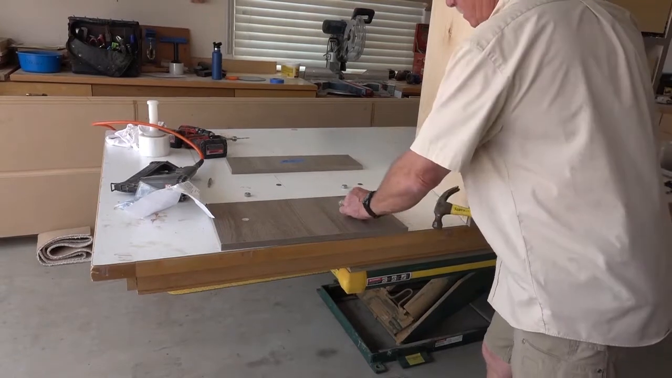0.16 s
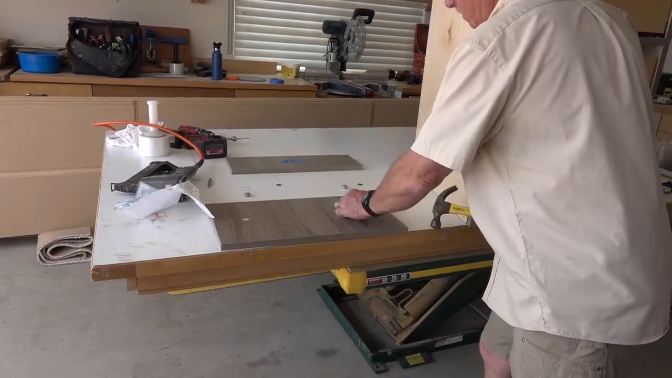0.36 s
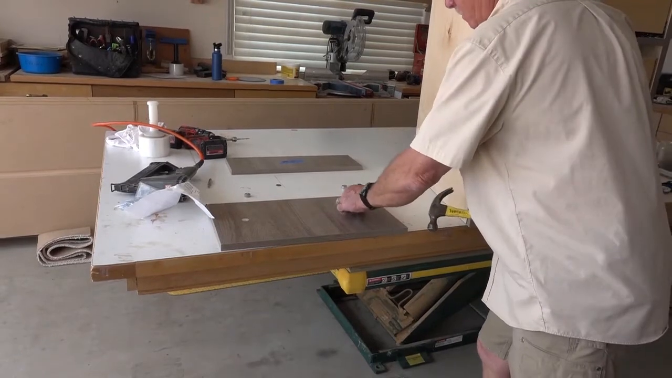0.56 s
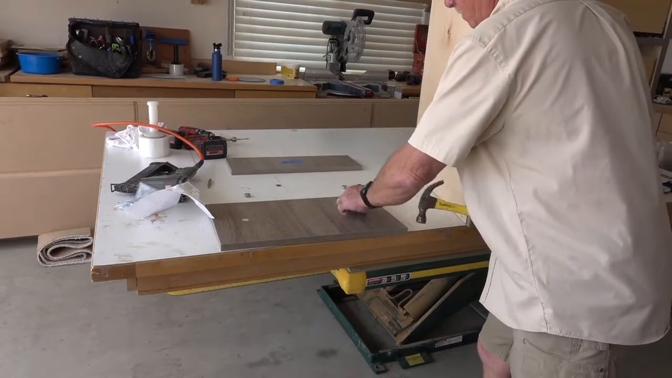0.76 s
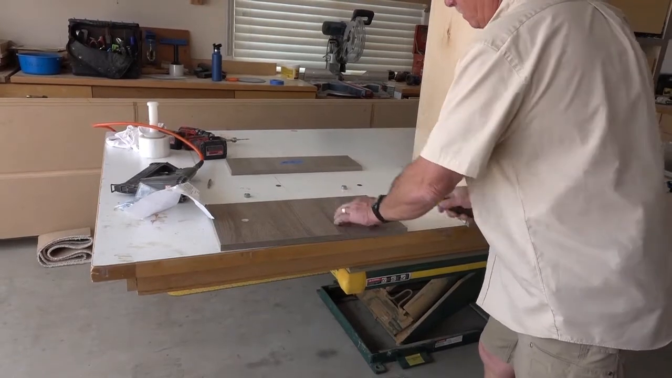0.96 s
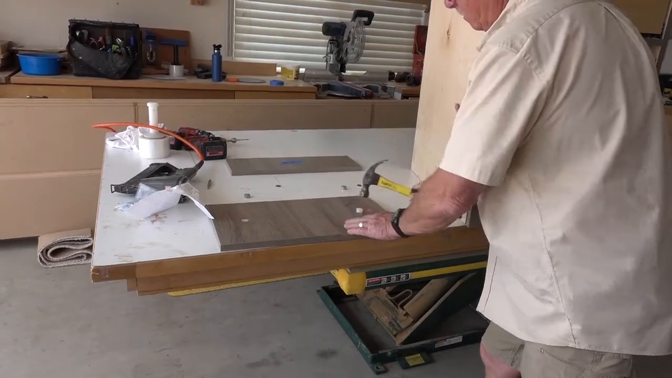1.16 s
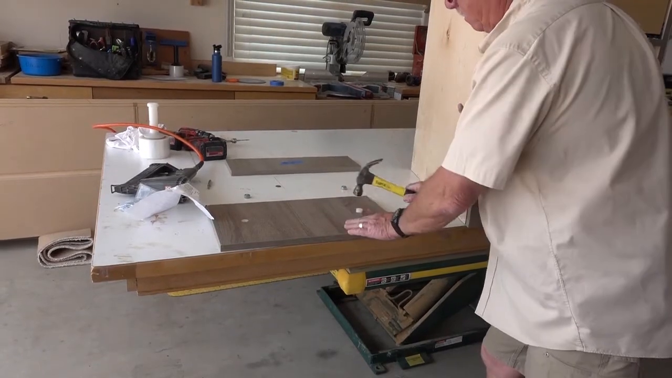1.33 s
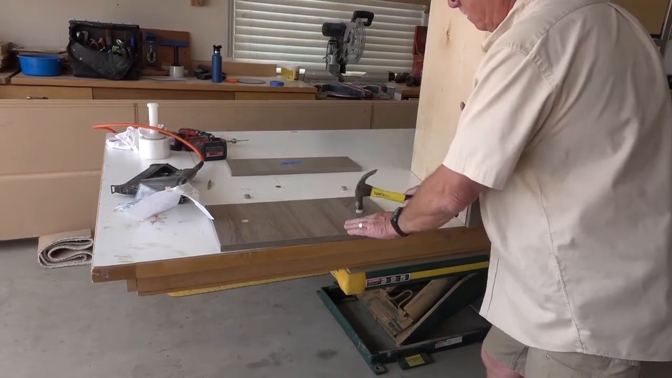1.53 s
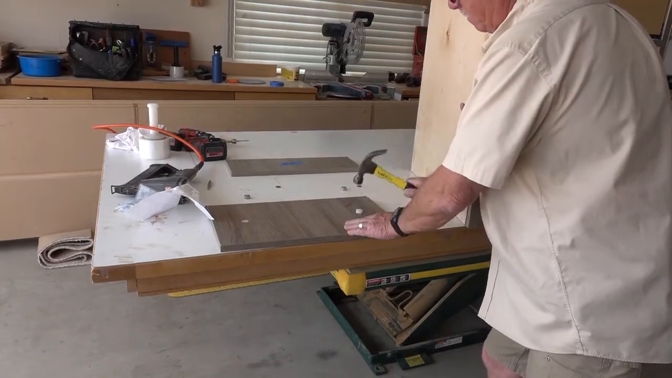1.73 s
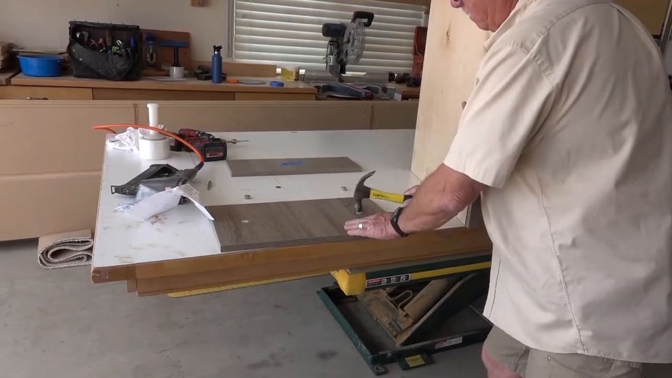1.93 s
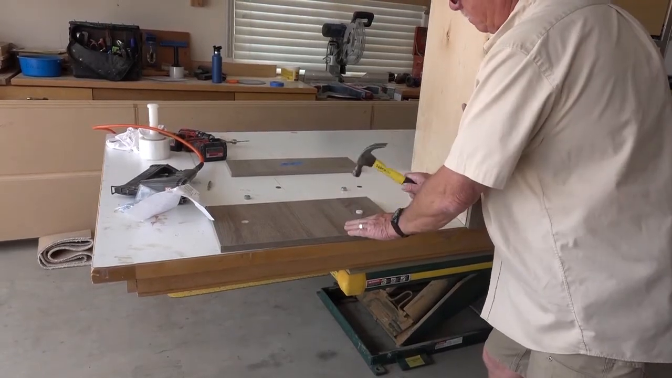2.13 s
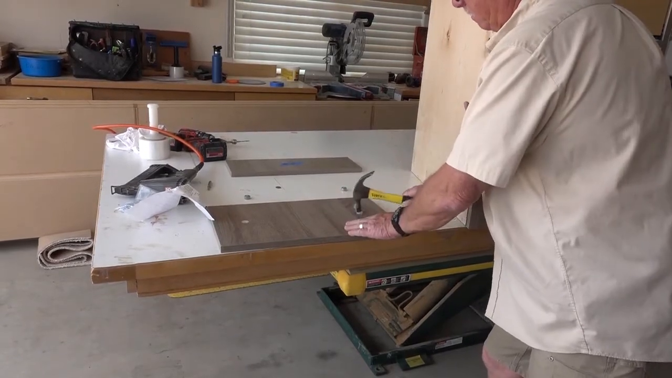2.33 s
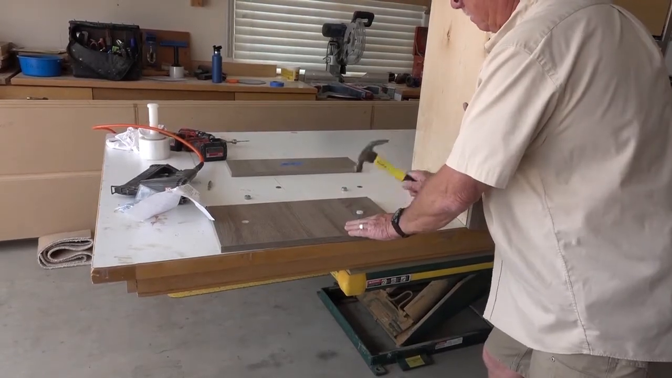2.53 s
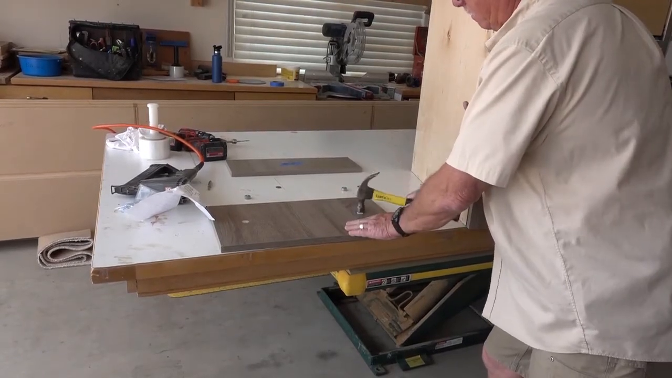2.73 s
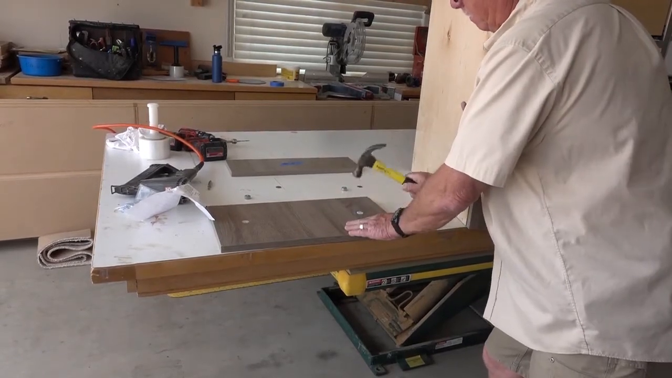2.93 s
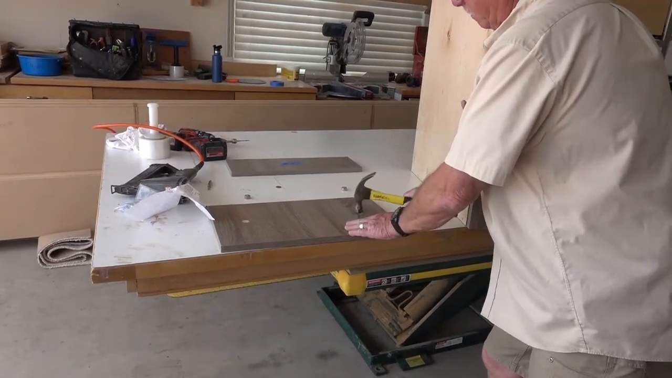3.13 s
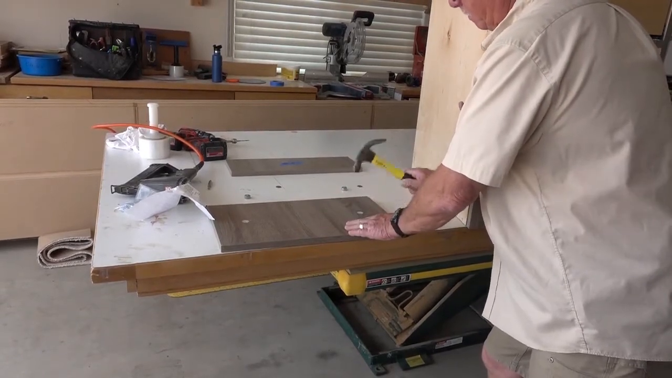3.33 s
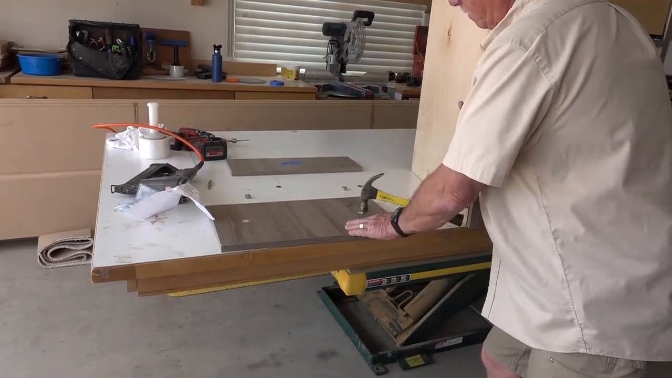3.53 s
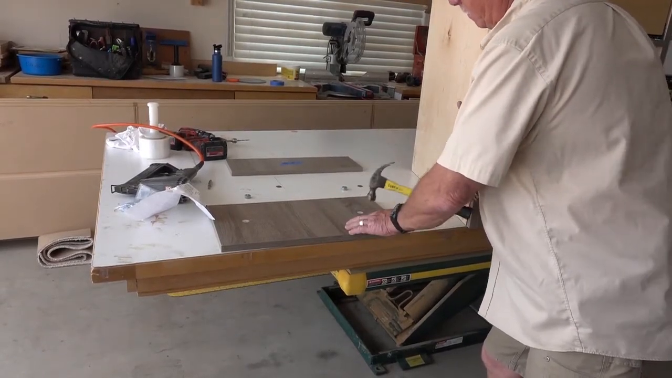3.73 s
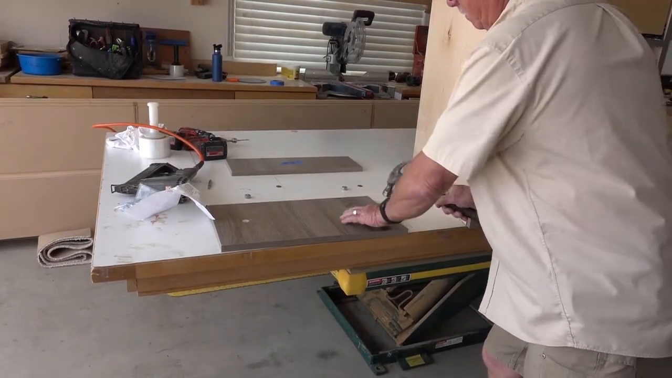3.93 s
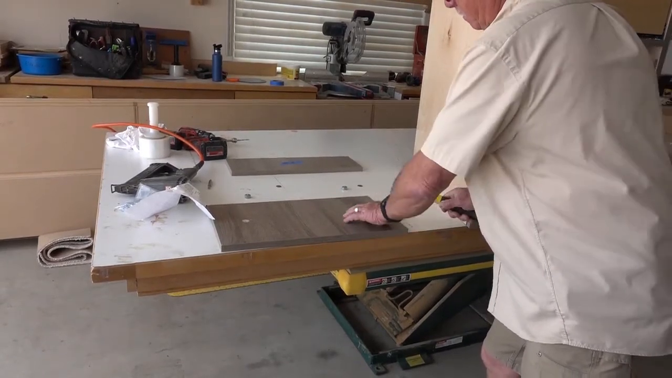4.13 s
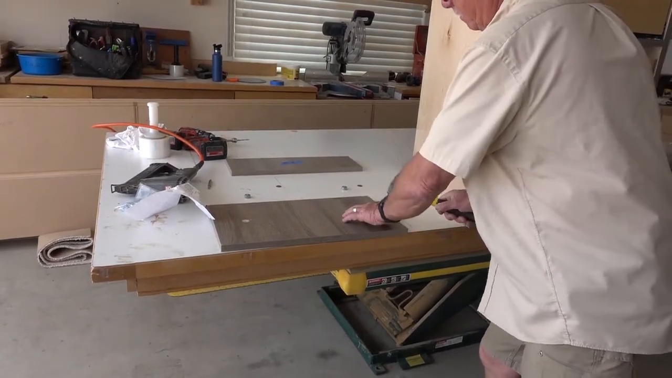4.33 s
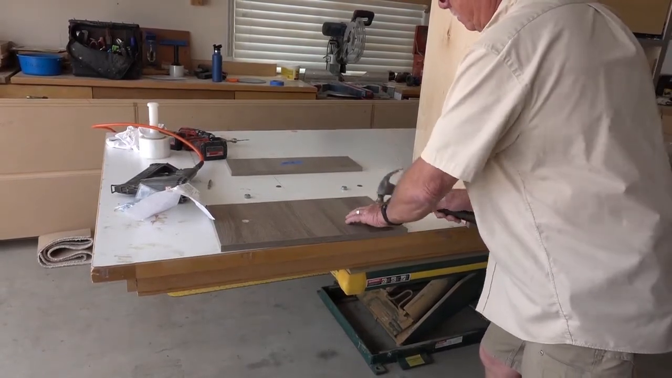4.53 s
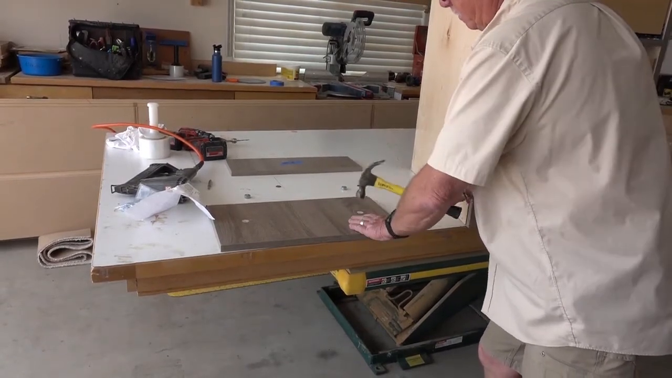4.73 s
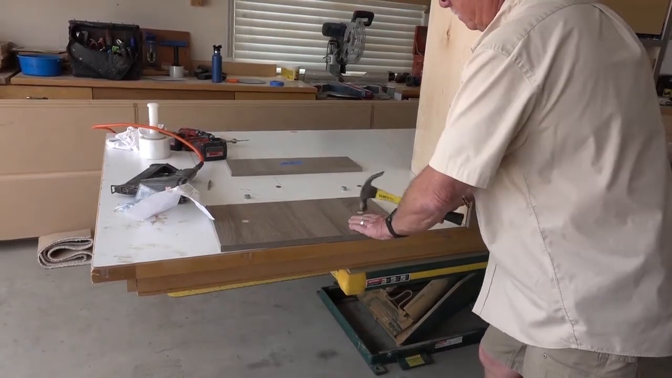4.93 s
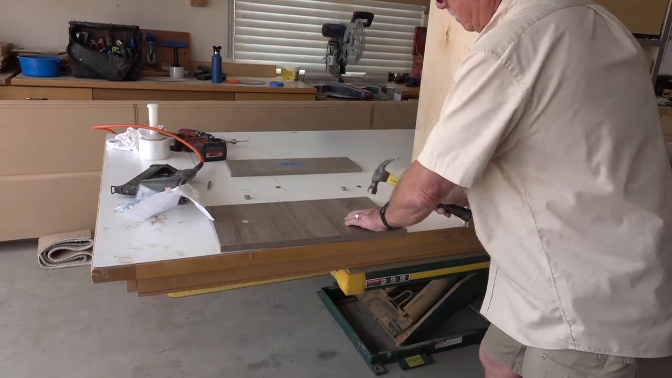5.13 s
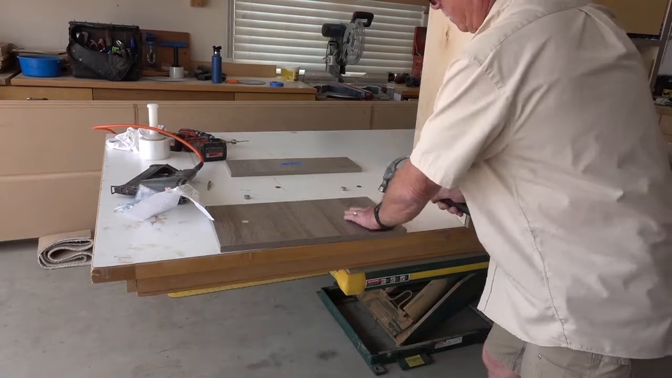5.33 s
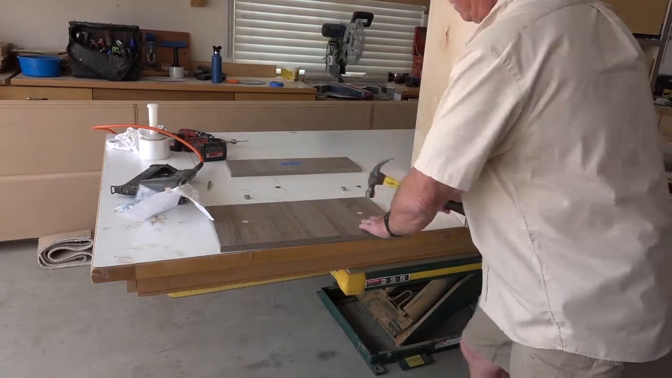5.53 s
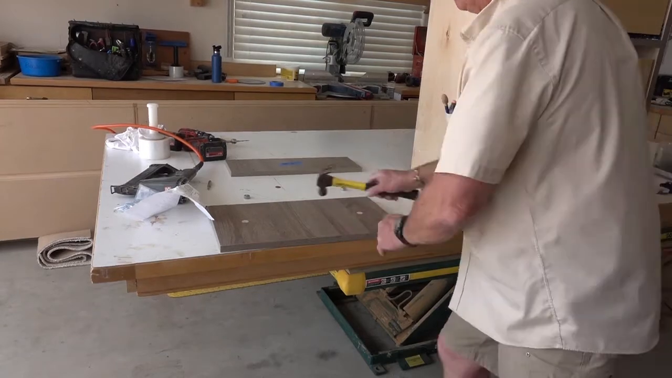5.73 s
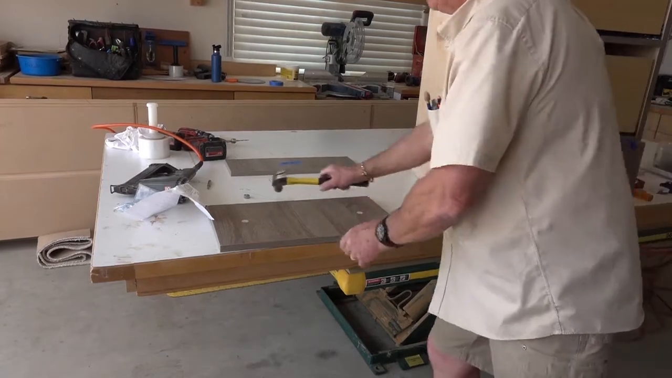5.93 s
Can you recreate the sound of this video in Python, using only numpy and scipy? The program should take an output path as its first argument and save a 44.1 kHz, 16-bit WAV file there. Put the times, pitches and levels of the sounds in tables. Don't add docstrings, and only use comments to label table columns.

```python
import sys
import numpy as np
from scipy import signal
from scipy.fft import irfft
from scipy.io import wavfile
from scipy.ndimage import uniform_filter1d

SR = 44100
rng = np.random.default_rng(int(sys.argv[2]) if len(sys.argv) > 2 else 0)


def waveform_to_disk(signal):
    frames = np.transpose(np.atleast_2d(signal))
    scaled = np.clip(frames, -1, 1) * 32767
    samples = np.round(scaled).astype(np.int16)
    wavfile.write(sys.argv[1], SR, samples)


def nominal_scale(level):
    x = np.asarray(level, float) / 20
    return 10 ** x


N = 267687

# start in seconds, strength in dB, hardness in dB per octave, bench boom in dB,
# swell in dB as the loose panel answers late.
BLOWS = [
    (1.4484, -1, 3, 22, 11.5),
    (1.8434, 4, 5.5, 27, 18),
    (2.28, 8, 2.5, 10.5, 22.5),
    (2.7013, 5.5, 3, 9, 15),
    (3.107, 6, 3, 11.5, 21.5),
    (3.5201, 10, 1, 5, 24),
    (4.9297, 7, 0, 3, 37.5),
    (5.7936, -45, 8, 7, 12.5),
]
# start in seconds, strength in dB, hardness in dB per octave, boom in dB.
CLICKS = [
    (0.334, -66, 4.5, -12),
    (0.393, -69, 5.5, -20),
    (5.004, -28.5, 5.5, 27),
    (5.598, -66.5, 3, -2),
    (5.671, -67, 4.5, -6),
    (5.826, -59.5, 2.5, -28),
]
# frequency in Hz, level in dB per Hz.
KNOCK_COLOUR = [(30, -37), (70, -19), (105, -12), (146, -6), (310, -2.5), (450, -10), (570, -3.5),
                (930, -9.5), (1300, -12), (2070, -20.5), (2600, -22), (5300, -38.5), (11000, -51),
                (14000, -68.5)]
# frequency in Hz, level in dB, T60 in seconds.
BENCH_MODES = [(135.54, -22, 0.24), (166.4, -25, 0.2), (206.4, -30, 0.4), (281.5, -32, 0.33),
               (373.6, -31, 0.35)]
# frequency in Hz, level in dB, T60 in seconds.
PANEL_MODES = [(544, -35, 0.37), (604, -16.5, 0.1), (702, -27.5, 0.28), (754, -29, 0.36),
               (897, -30.5, 0.24), (923.1, -35.5, 0.52), (1047, -11.5, 0.21), (1284, -28.5, 0.47),
               (1210, -36.5, 0.44), (1300, -52, 0.63), (1564, -28, 0.5), (1910, -47.5, 0.11),
               (2090, -27.5, 0.12), (2680, -26.5, 0.41)]
# frequency in Hz, level in dB, T60 in seconds.
FRAME_MODES = [(213.4, -52, 1.4), (222, -54, 0.7), (1140, -53, 0.9), (1175, -47, 1.1)]
# frequency in Hz, T60 in seconds.
SHOP_T60 = [(80, 0.24), (220, 0.26), (600, 0.3), (1800, 0.32), (4800, 0.34), (10000, 0.29)]
# frequency in Hz, likeness from 0 to 1.
SHOP_LIKENESS = [(60, 1), (170, 0.97), (500, 0.85), (1420, 0.79), (4090, 0.44), (11800, 0.89)]
# frequency in Hz, rise in seconds.
ROOM_FILL = [(100, .08), (300, .05), (700, .014), (3000, .012), (10000, .025)]
# start in seconds, level in dB.
LAID = [
    (5.794, -38.5),
    (5.82, -37),
]
# frequency in Hz, level in dB, T60 in seconds.
LAID_MODES = [(218, 1, 0.034), (1520, -19, .12), (2980, -16, .15), (4530, -14.5, 0.23)]
# time in seconds, frequency in Hz, level in dB.
SQUEAK = [(.14, 8050, -80), (.17, 8900, -76), (.195, 9450, -76), (.23, 9650, -74), (.28, 9500, -75),
          (.32, 9100, -77), (.355, 8950, -77), (.372, 9050, -77), (.387, 8600, -80)]
# start in seconds, level in dB, first Hz, last Hz, pan in dB to the left.
CHIPS = [(.565, -80, 5600, 5500, 13), (.55, -75, 3600, 3490, 17), (.622, -52, 5600, 5150, 8),
         (1.315, -77, 5400, 5060, 23), (2.183, -51.5, 5550, 5160, 8), (4.62, -80, 3470, 3370, 8.5),
         (5.3, -69, 5600, 5160, 15), (6.02, -68, 5670, 5150, 23)]
# middle in seconds, length in seconds, hand scuff in dB, cloth rustle in dB.
MOVES = [(0.027, .15, -74, -74), (0.405, 0.065, -61, -71), (1.113, 0.54, -87, -68.5), (3.957, .3, -85, -76),
         (5.29, 0.13, -55, -69.5), (4.174, 0.23, -94.5, -77), (4.376, 0.046, -90, -76.5),
         (4.73, 0.28, -75.5, -84.5), (5.5, 0.49, -77.5, -71), (5.65, 0.26, -60, -68),
         (5.879, 0.57, -64.5, -76.5)]
# frequency in Hz, level in dB per Hz.
RUMBLE_COLOUR = [(12, -41), (20, -5), (37, -7), (59, 12), (119, -6), (173, -0.5), (285, -13.5), (400, -12),
                 (520, -31), (880, -120)]
# frequency in Hz, level in dB per Hz.
ROAD_COLOUR = [(200, -43.5), (320, -20.5), (400, -8.5), (520, -7.5), (700, -4.5), (790, -3), (860, -2),
               (1120, -6.5), (1270, -6.5), (2300, -26.5), (3000, -43)]
# frequency in Hz, level in dB per Hz.
SCUFF_COLOUR = [(1200, -13.5), (1800, -0.5), (2500, -7), (3600, -9.5), (4600, -15), (6000, -21.5),
                (8000, -48)]
# frequency in Hz, level in dB per Hz.
CLOTH_COLOUR = [(2940, -26), (5000, -0.5), (5860, -4.5), (6590, -3.5), (7970, -3.5), (9750, -0.5),
                (11200, -4.5), (14600, -54.5), (22000, -120)]
# frequency in Hz, likeness from 0 to 1.
AIR_LIKENESS = [(60, 1), (170, 1), (500, 0.84), (1420, 0.56), (4090, 0.36), (11800, 0.55)]
# frequency in Hz, width in Hz, level in dB.
ROAD_LINES = [(105.6, 5.7, 8.5), (685, 12, 9), (735, 43, 9.5)]
# time in seconds, level in dB below
BACKGROUND_FADE = [(0, 0.5), (.85, -2.5), (1.45, -2), (4, -11.5), (4.35, -22.5), (4.9, -15.5), (5.4, -14.5),
                   (5.75, -21), (6.07, -13)]
# level in dB at loudest, share of the background fade it follows.
WASHES = [
    (-53.5, 0.58),
    (-49.5, 1.0),
    (-63, 1.1),
    (-75.5, 0.38),
]
# middle in seconds, length in seconds, level in dB.
LORRY = (5.4, 2, -55.5)

SPOT_DB, BEAT_DB, RING_DB = 5, 2.5, -10
FRAME_DB_PER_SWELL = 0.83
BOOM_HZ, HOLLOW_HZ = 333.8, 742
HOLLOW_SHARE = .3
CRACK_DB, CRACK_T60, CRACK_TILT_DB = -20.5, 0.0084, 5
CRACK_HZ, CRACK_FOCUS_DB = 1800, 2.2
TICK_DB, SEAT_S = -6, .0016
BOUNCE_S, BOUNCE_DB = .0045, 7
BUILD_S, SWELL_S = .006, .05
SNAP_PER_DB, FULL_BLOW_DB = .8, 6
CLICK_SWELL_DB, CLICK_SNAP_DB = -4, 12
LEFT_DB, TRAFFIC_LEFT_DB = 0.3, 3
ALIKE = 0.78
LUMPY_DB = 0.5
LATE_DB, LATE_T60 = -8.5, 0.99
CHIP_DIRECT_DB, CHIP_FLUTTER = -2, .008
LIMIT_DB, SQUEEZE, RELEASE_DB_PER_S = -18.5, 0.68, 156.5


def evened(x):
    return x / np.sqrt(np.mean(x ** 2) + 1e-20)


def read(points, hz):
    f, value = np.transpose(points)
    return np.interp(np.log(hz + 1), np.log(f + 1), value)


def add(mix, s, sound):
    part = mix[:, round(s * SR):][:, :sound.shape[1]]
    part += sound[:, :part.shape[1]]


def pair(likeness, hz, frames):
    a, b, c, d = rng.standard_normal((frames, len(hz), 4)).T
    share = np.clip(read(likeness, hz), 0, 1)[:, None]
    left = a + 1j * b
    right = share * left + np.sqrt(1 - share ** 2) * (c + 1j * d)
    return np.array([left, right])


def causal(db):
    log_gain = np.log(nominal_scale(np.maximum(db, -100)))
    full = np.concatenate([log_gain, log_gain[-2:0:-1]])
    return irfft(np.exp(np.conj(signal.hilbert(full))[:len(db)]))


def knock(row, common, modes, snap_db):
    s, db, hard_db, boom_db, swell_db = row
    hz = np.fft.rfftfreq(4096, 1 / SR)
    octaves = np.log2((hz + 30) / 1000)
    colour_db = read(KNOCK_COLOUR, hz) + hard_db * octaves
    hollow_db = HOLLOW_SHARE * boom_db * np.exp(-(np.log2((hz + 30) / HOLLOW_HZ) / .5) ** 2)
    body = causal(colour_db + hollow_db + boom_db / (1 + (hz / BOOM_HZ) ** 4))

    t = np.arange(common.shape[1]) / SR
    own = echoes(len(t), 0.99)
    wake_db = SPOT_DB * rng.standard_normal(len(modes))
    wake_db[-len(FRAME_MODES):] = FRAME_DB_PER_SWELL * (23.5 - max(swell_db, 15))
    struck = nominal_scale(wake_db) @ modes
    tail = common + np.sqrt(1 - ALIKE ** 2) * own + struck
    tail *= 1 - np.exp(-(t / BUILD_S) ** 2)
    tail *= nominal_scale(-swell_db * np.exp(-t / SWELL_S))
    sound = signal.fftconvolve(tail, body[None] / np.linalg.norm(body), axes=1)[:, :len(t)]

    chatter = rng.standard_normal(900) * nominal_scale(-60 * t[:900] / CRACK_T60)
    chatter = nominal_scale(TICK_DB) * chatter + np.roll(chatter, round(SEAT_S * SR))
    focus_db = CRACK_FOCUS_DB * np.log2((hz + 30) / CRACK_HZ) ** 2
    crack = np.convolve(chatter, causal(colour_db + CRACK_TILT_DB * octaves - focus_db))
    crack /= np.linalg.norm(crack)
    crack = nominal_scale(CRACK_DB + snap_db - 0.65 * swell_db) * crack * np.ones((2, 1))
    add(sound, 0, crack)

    bounce = signal.lfilter([1, -.85], 1, crack)
    bounce[1] = np.roll(bounce[1], 3)
    add(sound, BOUNCE_S, nominal_scale(BOUNCE_DB) * bounce * nominal_scale([[1.5], [-1.5]]))
    return s, nominal_scale(db) * np.sqrt(.08 * SR) * sound * nominal_scale([[LEFT_DB / 2], [-LEFT_DB / 2]])


def ringing(length):
    t = np.arange(length) / SR
    hz, db, t60 = np.transpose(BENCH_MODES + PANEL_MODES + FRAME_MODES)[:, :, None]
    steps = rng.standard_normal((2, len(hz), length // 1400 + 2))
    smooth = [[np.interp(t * SR / 1400, np.arange(len(r)), r) for r in rows] for rows in steps]
    beat, drift = np.array(smooth)
    modes = nominal_scale(BEAT_DB * beat - 60 * t / t60) * np.sin(2 * np.pi * hz * t + 1.77 * drift)
    modes *= 1 - np.exp(-t / read(ROOM_FILL, hz))
    return nominal_scale(db + RING_DB) * modes / np.linalg.norm(modes, axis=1, keepdims=True)


def echoes(length, stretch):
    hz, frames = np.fft.rfftfreq(256, 1 / SR), length // 64 + 4
    t = np.arange(frames) * 64 / SR
    fill = 1 - .9 * np.exp(-t / read(ROOM_FILL, hz)[:, None])
    decay = nominal_scale(-60 * t / (stretch * read(SHOP_T60, hz))[:, None])
    z = pair(SHOP_LIKENESS, hz, frames) * fill * decay
    clumps = uniform_filter1d(rng.standard_normal((frames, len(hz))).T, size=24, axis=0)
    z *= nominal_scale(LUMPY_DB * evened(uniform_filter1d(clumps, size=5, axis=1)))
    tail = signal.istft(z, nperseg=256, noverlap=192)[1][:, :length]
    return tail / np.linalg.norm(tail[0])


def laid(row):
    s, level_db = row
    t = np.arange(SR // 4) / SR
    hz, db, t60 = np.transpose(LAID_MODES)[:, :, None]
    drift = np.cumsum(rng.standard_normal((2, len(hz), len(t))), axis=2) * 0.084 * np.sqrt(hz / 4000)
    modes = nominal_scale(db - 60 * t / t60) * np.sin(2 * np.pi * hz * t + drift)
    return s, nominal_scale(level_db) * modes.sum(1)


def squeak():
    s, hz, db = np.transpose(SQUEAK)
    t = np.arange(s[0], s[-1], 1 / SR)
    waver = evened(uniform_filter1d(rng.standard_normal((len(t), 2)), size=200, axis=0))
    turns = np.cumsum(np.interp(t, s, hz) * (1 + 0.00086 * waver[:, 0])) / SR
    level = nominal_scale(np.interp(t, s, db) + 0.9 * waver[:, 1])
    tone = np.sqrt(2) * np.sin(2 * np.pi * turns) * level
    return s[0], tone * signal.windows.tukey(len(t), .1) * np.ones((2, 1))


def chip(row, tail):
    s, db, first_hz, last_hz, pan_db = row
    t = np.arange(round(0.052 * SR)) / SR
    hz = last_hz + (first_hz - last_hz) * np.exp(-(t / .014) ** 2)
    hz *= 1 + CHIP_FLUTTER * evened(uniform_filter1d(rng.standard_normal(len(t)), size=150))
    note = np.sin(2 * np.pi * np.cumsum(hz) / SR) * signal.windows.tukey(len(t), .5)
    sound = nominal_scale(-3.0) * signal.fftconvolve(note[None], tail, axes=1)
    add(sound, 0, nominal_scale(CHIP_DIRECT_DB) * note * np.ones((2, 1)))
    return s, nominal_scale(db) * sound * nominal_scale([[pan_db / 2], [-pan_db / 2]])


def arc(t, middle, length):
    return np.cos(np.pi * np.clip((t - middle) / length, -.5, .5)) ** 2


def hands(t):
    middle, length, scuff_db, cloth_db = np.transpose(MOVES)[:, :, None]
    power = arc(t, middle, length)
    return [np.sqrt((nominal_scale(db) ** 2 * power).sum(0)) for db in (scuff_db, cloth_db)]


def lorry(t):
    middle, length, db = LORRY
    return nominal_scale(db) * np.sqrt(arc(t, middle, length))


def air():
    frames, hz = N // 256 + 5, np.fft.rfftfreq(1024, 1 / SR)
    t = np.arange(N) / SR
    fade_db = np.interp(t, *np.transpose(BACKGROUND_FADE))
    near_gains = [lorry(t), 0, *hands(t)]
    lines_db = sum(db / (1 + (2 * (hz - f) / width) ** 2) for f, width, db in ROAD_LINES)
    colours = (RUMBLE_COLOUR, ROAD_COLOUR, SCUFF_COLOUR, CLOTH_COLOUR)
    out = np.zeros((2, N))
    for colour, (db, share), near, patchy_db in zip(colours, WASHES, near_gains, (2.5, 0.53, 3.5, 0.53)):
        patches = uniform_filter1d(rng.standard_normal((frames, len(hz))).T, size=10, axis=0)
        patches = evened(uniform_filter1d(patches, size=12, axis=1))
        colour_db = (read(colour, hz) + lines_db)[:, None]
        z = pair(AIR_LIKENESS, hz, frames) * nominal_scale(colour_db + patchy_db * patches)
        wash = evened(signal.istft(z, nperseg=1024, noverlap=768)[1][:, :N])
        out += wash * np.hypot(nominal_scale(db + share * fade_db), near)
    lean_db = TRAFFIC_LEFT_DB * nominal_scale(fade_db) / 2
    return out * nominal_scale([lean_db, -lean_db])


def scene():
    mix = air()
    late = signal.lfilter([.2], [1, -.45], echoes(SR, LATE_T60 / .5))
    common = ALIKE * echoes(SR, 0.9) + nominal_scale(LATE_DB) * late
    modes = ringing(SR)
    for row in BLOWS:
        snap_db = SNAP_PER_DB * np.clip(row[1] - FULL_BLOW_DB, -8, 0)
        add(mix, *knock(row, common, modes, snap_db))
    half = SR // 2
    for row in CLICKS:
        add(mix, *knock((*row, CLICK_SWELL_DB), common[:, :half], modes[:, :half], CLICK_SNAP_DB))
    for row in LAID:
        add(mix, *laid(row))
    add(mix, *squeak())
    yard = echoes(half, 2.47)
    for row in CHIPS:
        add(mix, *chip(row, yard))
    return mix


def roll_off(x):
    return signal.sosfilt(signal.butter(12, 12370, fs=SR, output="sos"), x)


def record(dry):
    power_db = 10 * np.log10(abs(uniform_filter1d((dry ** 2).mean(0), size=160)) + 1e-12)
    fall_db = np.arange(N) * RELEASE_DB_PER_S / SR
    held_db = np.maximum.accumulate(power_db + fall_db) - fall_db
    over_db = np.maximum(held_db - LIMIT_DB, 0)
    limited = dry / nominal_scale(SQUEEZE * uniform_filter1d(over_db, size=60))
    low_pass = signal.firwin(767, 11080, window=("kaiser", 7), fs=SR)
    return roll_off(signal.oaconvolve(limited, low_pass[None], "same"))


dry = scene()
out = record(dry)
waveform_to_disk(out)
```